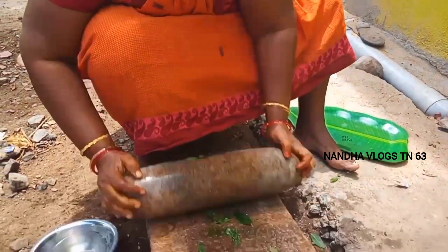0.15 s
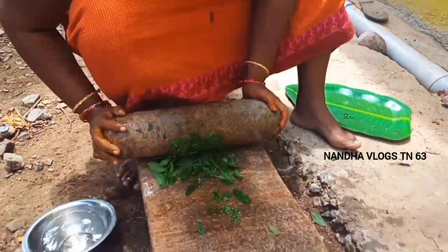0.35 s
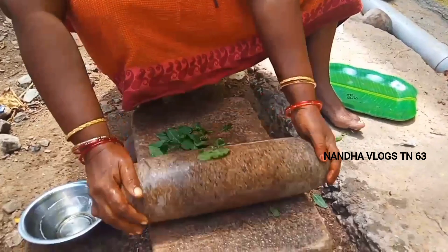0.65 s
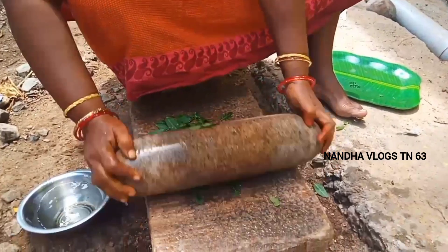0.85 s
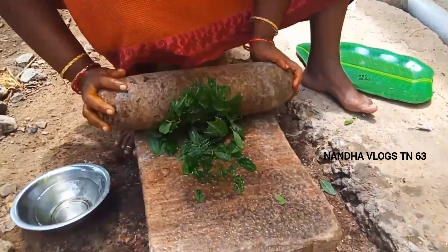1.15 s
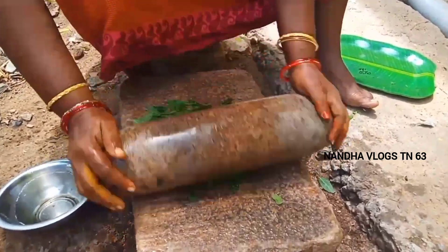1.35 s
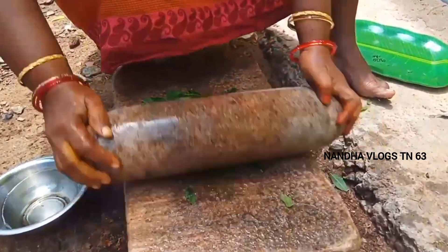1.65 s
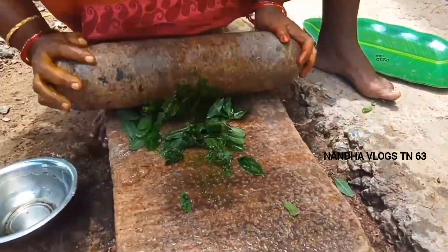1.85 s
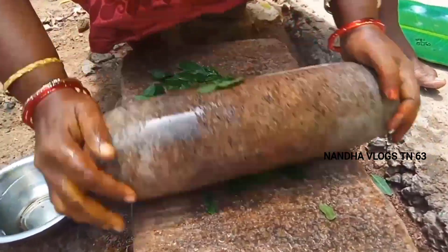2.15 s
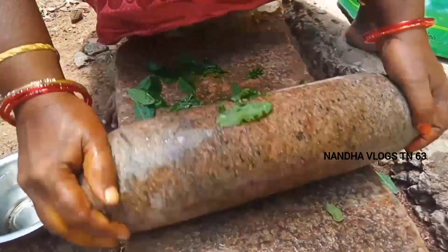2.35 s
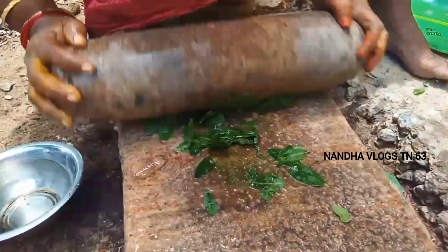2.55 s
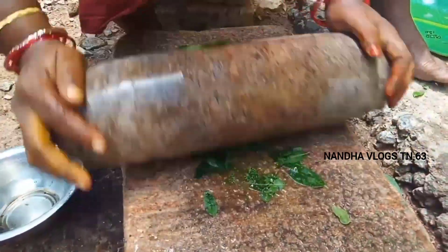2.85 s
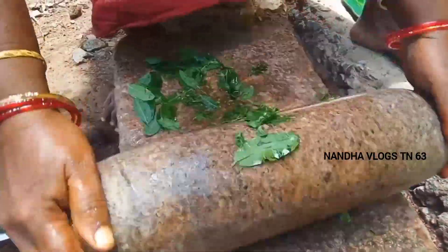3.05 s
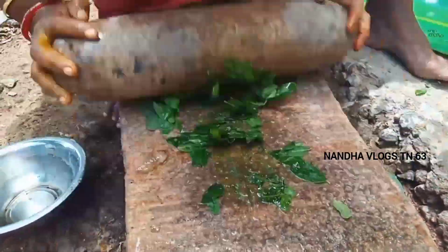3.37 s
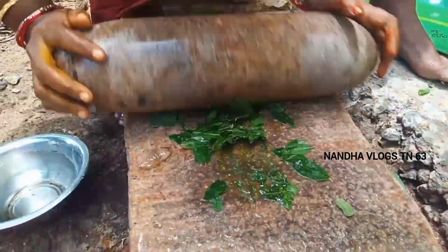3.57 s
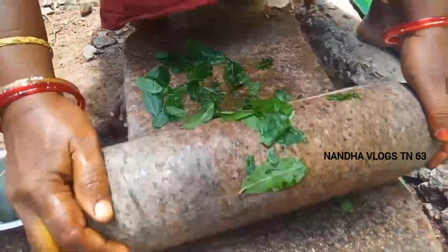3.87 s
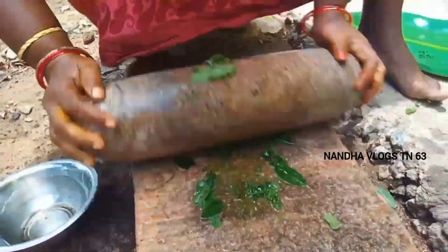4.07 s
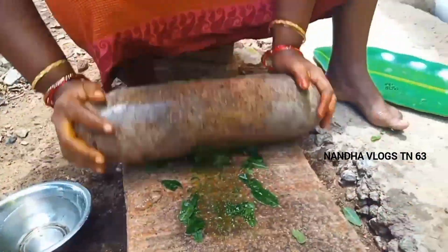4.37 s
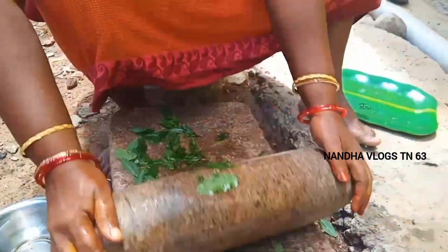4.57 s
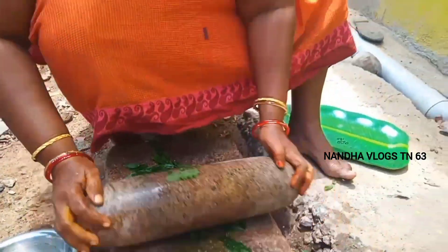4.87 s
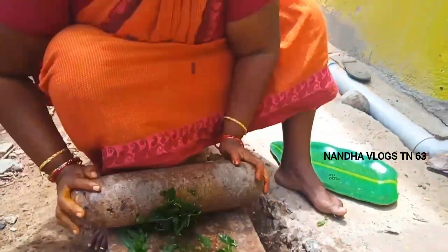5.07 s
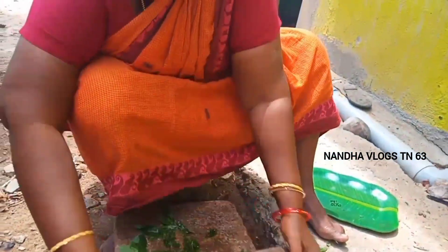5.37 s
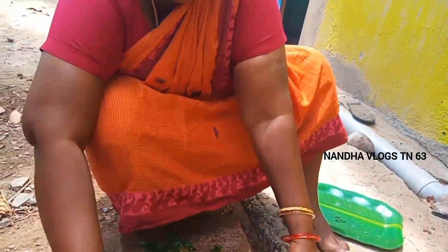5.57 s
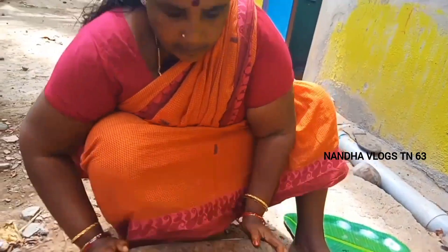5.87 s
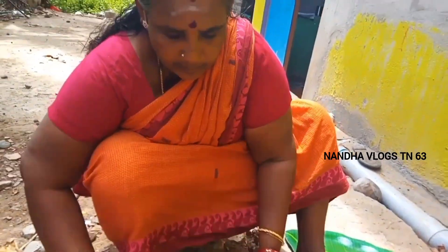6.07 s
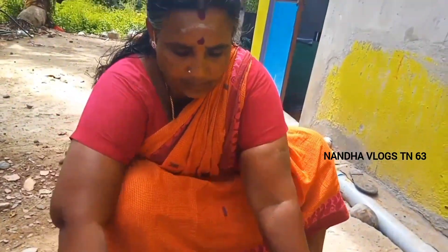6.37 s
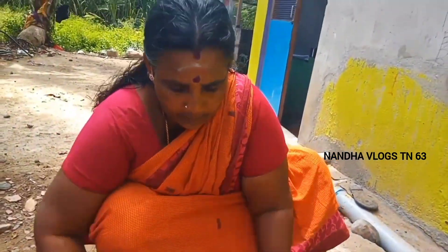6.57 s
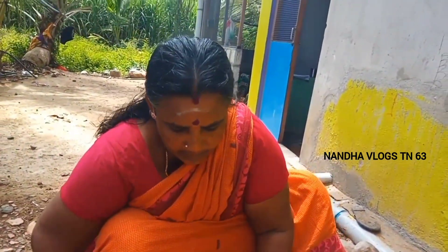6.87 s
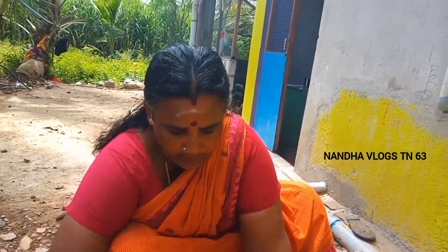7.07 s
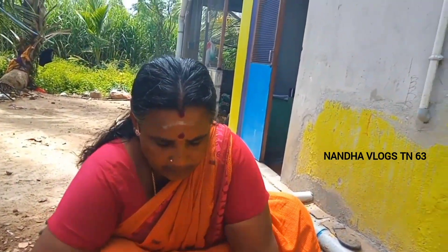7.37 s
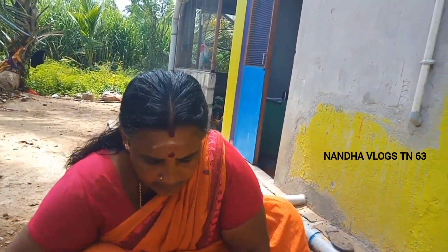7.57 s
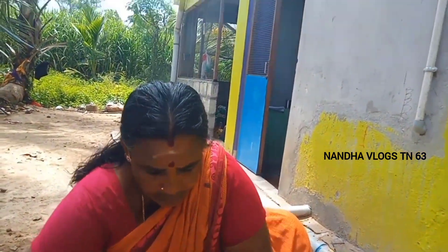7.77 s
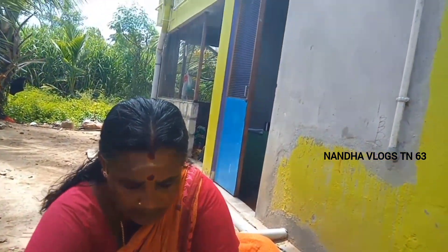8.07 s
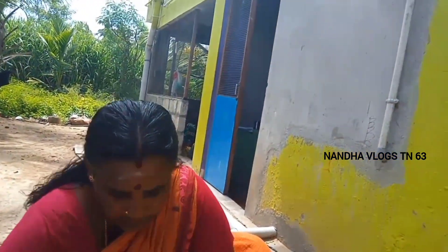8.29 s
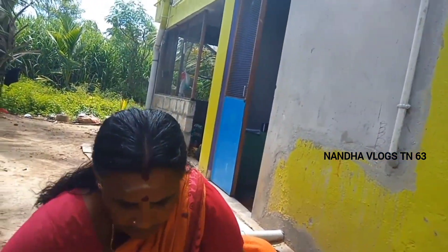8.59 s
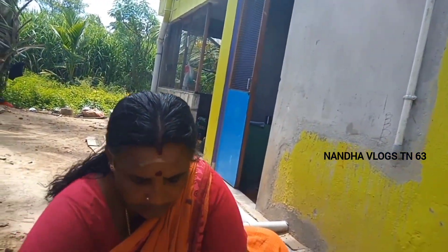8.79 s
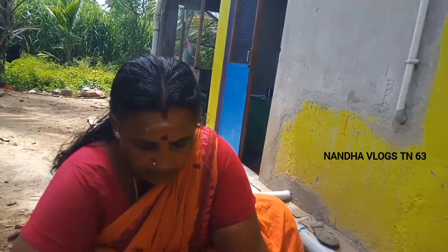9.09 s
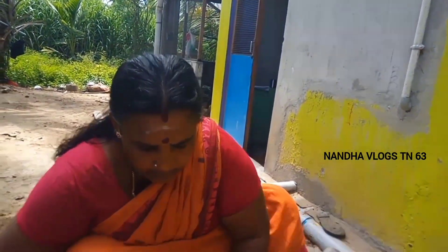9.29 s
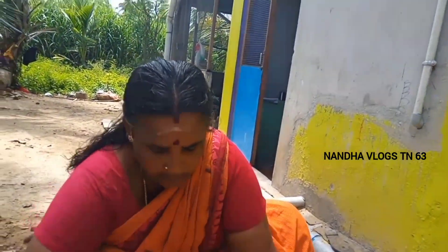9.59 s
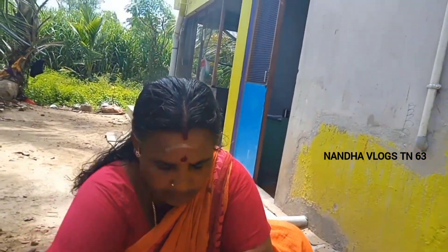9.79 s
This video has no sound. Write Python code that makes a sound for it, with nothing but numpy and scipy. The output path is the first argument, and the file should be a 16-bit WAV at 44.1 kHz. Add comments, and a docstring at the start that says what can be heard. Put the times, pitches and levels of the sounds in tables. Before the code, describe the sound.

A heavy stone roller scrapes back and forth over wet leaves and grit on a slab, with hard irregular knocks and chinking bangles outdoors.

```python
"""First comes a short hiss of wet grit: a stone roller is pushed to and fro over fresh leaves on a slab, outdoors.
The hiss is noise plus random grit clicks, filtered; a low rumble of filtered noise follows each stroke.
At the turns the roller knocks down and rocks onto its other end: dying tones, echoed by a rough house wall.
Bangles on the wrists chink in clusters of high tones, and hard grains crack in short bursts of noise.
Halfway the microphone tilts up, away from the slab: the top treble fades, then partly returns."""
import sys
import numpy as np
from scipy import signal
from scipy.fft import rfft, irfft
from scipy.io import wavfile
from scipy.ndimage import uniform_filter1d

SR = 44100
rng = np.random.default_rng(int(sys.argv[2]) if len(sys.argv) > 2 else 0)


def persist_wave(psi):
    """Save psi, clipped to +-1, as 16-bit WAV."""
    counts = np.round(np.clip(psi, -1, 1) * 32767).astype(np.int16)
    wavfile.write(sys.argv[1], SR, np.atleast_2d(counts).T)


N = 438354  # length of the scene [samples]

# Colour of the faint outdoor background: (frequency [Hz], relative level [dB])
AIR_COLOUR = [(20, -29), (45, -9.5), (90, -13.5), (200, -3.5), (400, -13.5), (900, -14.5), (2000, -21),
              (4500, -34.5), (7000, -10.5), (9000, -21.5), (13000, -33), (15000, -24)]

# Pushes and pulls of the roller; the scrape is trimmed again later:
# (start [s], length [s], level at the hardest press before trim [dB],
#  place of that press in the stroke [share of length], rise from the stroke's ends to it [dB])
STROKES = [(0.006,0.28,-42,0.38,21.5), (0.404,0.18,-43.5,0.24,7.5), (0.77,0.27,-47,0.29,15),
           (1.14,0.3,-40.5,0.37,16), (1.565,0.25,-37.5,0.28,11.5), (1.929,0.27,-36,0.38,19),
           (2.337,0.24,-46,0.29,6.5), (2.709,0.27,-40,0.28,14), (3.125,0.2,-35.5,0.51,14),
           (3.501,0.28,-37,0.22,17.5), (3.909,0.26,-45.5,0.2,7), (4.292,0.29,-49,0.13,6),
           (4.748,0.25,-60,0.88,-7), (5.13,0.28,-55,0.42,1.5), (5.547,0.28,-48.5,0.37,10.5),
           (5.998,0.24,-52,0.59,-2.5), (6.442,0.25,-49.5,0.19,6), (6.865,0.25,-52,0.94,3.5),
           (7.3,0.24,-44.5,0.45,4.5), (7.66,0.31,-47.5,0.47,12), (8.13,0.25,-52.5,0.27,10.5),
           (8.572,0.21,-53,0.28,4.5), (8.954,0.32,-51.5,0.086,7.5), (9.367,0.26,-53.5,0.24,8.5),
           (9.819,0.21,-49.5,0.44,18.5)]
# The roller gathers speed before each stroke and slows after it [dB/s]; a little rubbing stays at the turns [dB]
START_DB_PER_S, STOP_DB_PER_S, REST_DB = 267.5, 323.5, -78.5
FIRM_DB = -40.5  # rubbing level of a firm stroke, before trim
# Colour of the wet grit: (frequency [Hz], relative level [dB])
SCRAPE_COLOUR = [(300, -36), (1100, -22), (1700, -10), (2400, -10.5), (3300, -5), (5000, -3), (7400, -2),
                 (8300, -13.5), (9500, -15.5), (10500, -5), (11400, -3), (12600, -20.5), (13800, -26),
                 (15200, -7.5), (15900, -34)]
# Tones that the grit keeps ringing in the stones: (frequency [Hz], width to each side [Hz], average lift [dB])
SINGING_MODES = [(2380, 270, 7.5), (2775, 230, 4.5)]
# A broad peak in the hiss climbs as the rubbing gets stronger:
# pitch at rest [Hz], climb [octaves per dB of rubbing], width to each side [octaves], lift [dB]
PEAK_HZ, PEAK_CLIMB, PEAK_OCTAVES, PEAK_DB = 2600, 0.02, 0.278, 3.5
PEAK_DRIFT_OCTAVES = .3  # typical stray of that peak as the gap between the stones changes shape
SLIPS_PER_S, SLIP_S = 70, .0025  # sudden slips roughen the scrape: how many, and how fast each dies
BACK_END_DB = 1.5  # low grains gain this at the back end of the slab and lose it at the front end
# Leaves giving way under the roller: (middle [s], length [s], level before trim [dB])
CRUNCHES = [(0.511, 0.089, -39.5), (1.935, 0.025, -43.5), (2.355, 0.072, -42), (2.455, 0.054, -38.5),
            (2.735, 0.031, -44.5), (3.115, 0.076, -43), (3.35, 0.06, -47), (3.61, 0.079, -39),
            (4.492, 0.058, -48), (4.865, 0.057, -49.5), (4.995, 0.022, -44), (5.158, 0.035, -43.5),
            (5.68, 0.16, -50.5), (6.107, 0.019, -41.5), (6.182, 0.015, -41.5), (6.213, 0.013, -41),
            (6.58, 0.021, -39.5), (6.819, 0.027, -49), (6.87, 0.062, -47.5), (7.096, 0.041, -36),
            (7.725, 0.041, -42), (7.835, 0.099, -56), (7.95, 0.015, -45.5), (8.98, 0.041, -45.5),
            (9.175, 0.037, -43.5)]
# The top treble as the microphone tilts away: (time [s], treble change [dB])
TILT = [(3.3, -3), (4.05, 1), (5.7, -3.5), (7.4, -10), (9.9, -4.5)]

# Colour of the slab's low rumble: (frequency [Hz], relative level [dB])
RUMBLE_COLOUR = [(20, -29.5), (45, -11), (70, 3.5), (105, 7), (150, -8.5), (230, -29), (400, -37.5),
                 (3000, -79)]
# Bumpy stretches where the roller shakes the slab: (middle [s], length [s], level before trim [dB])
BUMPS = [(.27, 0.14, -56), (.935, 0.034, -44.5), (1.04, 0.11, -49.5), (1.21, 0.23, -53.5),
         (1.52, 0.092, -55), (1.75, 0.18, -53.5), (2.28, 0.058, -63.5), (2.65, 0.36, -51),
         (3.66, 0.32, -54.5), (4.03, 0.41, -54.5), (5.425, 0.044, -51.5), (5.77, 0.13, -60),
         (5.875, 0.028, -53.5), (6.72, 0.083, -54.5), (7.92, 0.1, -52.5), (8.64, 0.21, -63),
         (9.59, 0.15, -56)]
ROLL_DB, ROLL_FOLLOW = -70, 0.19  # rumble in a firm stroke [dB, before trim], gain per dB of rubbing [dB]

# How long the yard rings: (frequency [Hz], time to fall by 60 dB [s])
YARD_RING = [(100, 0.27), (500, 0.13), (900, 0.26), (1650, 0.28), (2400, 0.084), (3200, 0.12),
             (12000, 0.22)]

# The roller meets the slab: (time [s], clack level [dB], contact pitch [Hz], bandwidth, held to 0.2-4 [octaves],
#  slab thud level [dB], delay of the other end [s], its level against the clack [dB],
#  echo level against the clack [dB], roller's own ring against the clack [dB])
KNOCKS = [ (0.183, -16, 1480, 2.3, -20.5, 0.0032, 6, -10.5, -13),
          (1.0015, -37, 303, 0.86, -32, 0.0053, -25, -33, -40),
          (1.14, -43, 717, 0.14, -57, 0.011, -13, -20, -38),
          (1.39, -9, 1180, 2.54, -22, 0.01, -14, -14.5, -12),
          (1.9793, -8, 904, 1.41, -23, 0.0017, -12.5, -18.5, -19),
          (2.5406, -19, 930, 1.45, -27, 0.0014, -27, -18.5, -18),
          (3.5408, -7.5, 862, 1.6, -27.5, 0.0071, -15.5, -24, -25),
          (3.7391, -40.5, 262.4, 1.07, -30.5, 0.0046, -19, -19.5, -41),
          (4.143, -42, 231.5, 1.67, -30.5, 0.011, -6, -15, -32.5),
          (4.6366, -24.5, 672, 0.98, -34, 0.0094, -22, -25.5, -36),
          (4.957, -13, 1380, 1.76, -21, 0.0024, -2, -17.5, -15),
          (5.1373, -36, 807, 0.42, -47.5, 0.015, -14, -22.5, -43),
          (5.4006, -42.5, 458, 0.48, -57, 0.018, -18, -16, -46.5),
          (6.283, -34, 702, 0.5, -49.5, 0.0035, -0.5, -26, -36),
          (6.67, -31.5, 864, 0.49, -37.5, 0.0023, -14, -24, -13),
          (7.4756, -24.5, 870, 1.7, -39.5, 0.0073, -12, -16, -12),
          (7.683, -33.5, 850, 0.7, -49, 0.014, 1, -13, -35),
          (7.8685, -22, 790, 1.22, -32, 0.0074, -32, -24.5, -39),
          (8.36, -34, 618, 1.8, -50, 0.0024, -2, -14, -36.5),
          (9.252, -17, 1116, 0.89, -26.5, 0.0053, -5, -23.5, -15),
          (9.551, -28.5, 760, 0.98, -49, 0.014, -9, -20.5, -28)]
# Ring of roller and slab together: (frequency [Hz], relative level [dB], time to fall by 60 dB [s])
STONE_MODES = [(535, -8, .018), (680, -1, .016), (830, -4, .012), (1095, 0, .011), (1340, -3, .008),
               (1800, -4, .006)]
# The roller's own ring, bare stone on stone: (frequency [Hz], relative level [dB], time to fall by 60 dB [s])
ROLLER_MODES = [(2410, -1.5, 0.019), (3125, -0.5, 0.031)]
# The slab bouncing on the ground: (frequency [Hz], relative level [dB], time to fall by 60 dB [s])
SLAB_MODES = [(98.26, 9, 0.025), (153, -2.5, 0.1), (221, 0.5, 0.046), (336.2, 1.5, 0.022)]
# Small bounces after landing: time span [s], level against the clack [dB], which shrinks to nothing over the span
SETTLE_S, SETTLE_DB = 0.034, -16
SOFTER = .92  # later contacts are softer: their share of the first one's pitch

# Hard grains and stalks crack under the roller: (time [s], peak level [dB])
CRACKS = [(0.1839, -23), (2.513, -27.5), (2.542, -19.5), (2.7657, -31.5), (2.7756, -26), (2.797, -27),
          (3.095, -38), (3.2065, -38), (3.2667, -20), (3.307, -21), (3.318, -26.5), (3.5139, -22),
          (3.6285, -24), (4.954, -23), (7.095, -39), (8.086, -34.5), (8.982, -40)]

# Bangles touch: (time [s], level of the loudest moment [dB], time they keep rattling [s],
#  lift of the lower tones [dB per octave])
CHINKS = [(0.6602, -27.5, 0.022, 3.5), (0.908, -35.5, 0.0053, 0), (1.074, -44, 0.013, -3),
          (1.31, -31, 0.014, 5), (1.3190, -22.5, 0.0047, -6.5), (1.868, -31, 0.007, -4),
          (2.1225, -28, .003, -11), (2.128, -29, 0.011, 3), (2.184, -46.5, .004, 6.5),
          (2.9054, -20.5, 0.02, 1.5), (2.943, -35.5, 0.003, -2), (3.6452, -29, 0.0056, -5.5),
          (4.467, -42, 0.0035, -10.5), (4.755, -53, 0.013, 28.5), (5.351, -35.5, 0.024, 10),
          (5.388, -38, 0.0077, 11), (6.166, -39.5, 0.0077, 10), (7.0295, -30, 0.013, 4.5),
          (7.845, -43, 0.011, 11), (8.7207, -46, 0.0097, -1), (9.897, -49, 0.016, 2)]
# Each bending tone of the bangles is a cluster, as no two rings are alike:
# (frequency [Hz], spread to each side [Hz], relative level [dB], time to fall by 60 dB [s])
BANGLE_MODES = [(4780, 320, -30.5, 0.09), (8400, 330, -18, .06), (9335, 240, -15.5, .075),
                (10800, 1700, -11, 0.0089), (13200, 130, -12, 0.035), (14300, 490, -12.5, 0.028),
                (14860, 310, -2, 0.048)]

# Metal rings faintly after a knock: (time [s], peak level [dB])
THIN_RINGS = [(4.957, -69), (6.284, -69)]
THIN_HZ, THIN_T60_S = 5173, 1.5  # its pitch, and its time to fall by 60 dB

# The stone sticks and slips and sings in one tone: (start [s], length [s], pitch [Hz], level in the middle [dB])
GROANS = [(7.297, 0.3, 218, -55.5), (9.549, 0.06, 3050, -61), (9.818, 0.063, 3200, -63)]

# The roller totters loosely on the slab: (middle [s], length [s], level in the middle [dB])
RATTLES = [(7.482, 0.033, -43), (7.745, 0.1, -60), (9.62, 0.021, -63.5), (9.835, 0.16, -66.5),
           (9.877, 0.059, -55)]

EDGE_HZ = 15650  # treble above this is cut


def amp(db):
    """Turns decibels into a gain."""
    return 10 ** (np.asarray(db) / 20)


def unit(x):
    """Scales a signal to an average strength (rms) of 1."""
    return x / np.sqrt(np.mean(x ** 2) + 1e-20)


def read(points, hz):
    """Reads a table at the given frequencies, with pitch spaced as the ear hears it (log scale)."""
    f, value = np.transpose(points)
    return np.interp(np.log(hz + 1), np.log(f + 1), value)


def follow(rows, t):
    """Reads each column of a timed table at the times t."""
    s, *columns = np.transpose(rows)
    return [np.interp(t, s, c) for c in columns]


def add(mix, s, sound):
    """Lays a sound into the mix, starting at s seconds."""
    part = mix[max(round(s * SR), 0):][:len(sound)]
    part += sound[:len(part)]


def colour(x, spectrum):
    """Makes each frequency of x louder or softer, as a colour table says."""
    hz = np.fft.rfftfreq(len(x), 1 / SR)
    return irfft(rfft(x) * amp(read(spectrum, hz)), len(x))


def wander(rate_hz):
    """Smooth random drift of rms 1; movement faster than the given rate fades out."""
    hz = np.fft.rfftfreq(N, 1 / SR)
    return unit(irfft(rfft(rng.standard_normal(N)) / (1 + (hz / rate_hz) ** 2), N))


def ring(modes, t):
    """Sums dying tones; each blow lands elsewhere, so their levels and pitches vary a little."""
    hz, db, t60 = np.transpose(modes)[:, :, None]
    weight_db, shift = rng.standard_normal((2, len(modes), 1))
    phase = 2 * np.pi * hz * (1 + .015 * shift) * t
    fade = np.exp(-np.log(1000) * t / t60)
    return (amp(db + weight_db) * fade * np.sin(phase)).sum(0)


def swells(rows):
    """Gain that rises and falls in one smooth arch for each row."""
    gain = np.zeros(N)
    for middle, length, db in rows:
        arch = np.sqrt(np.hanning(max(int(length * SR), 3)))
        add(gain, middle - length / 2, amp(db) * arch)
    return gain


def contact(x, hz, octaves, order=3):
    """The springy contact passes a band of the tones, narrower when leaves cushion it; scaled to peak 1."""
    edges = hz * 2 ** (np.clip(octaves, .2, 4) * np.array([-.5, .5]))
    y = signal.sosfilt(signal.butter(order, edges, "bandpass", fs=SR, output="sos"), x)
    return y / abs(y).max()


def air():
    """Faint outdoor background: steady coloured noise."""
    return amp(-69.5) * unit(colour(rng.standard_normal(N), AIR_COLOUR))


def rubbing(t):
    """Rubbing level in dB: each stroke gets going, moves to and from its hardest press, and stops."""
    power = amp(REST_DB) ** 2
    for start, length, db, hardest, swell_db in STROKES:
        end = start + length
        peak = start + length * np.clip(hardest, .05, .95)
        press_db = np.interp(t, [start, peak, end], [-swell_db, 0, -swell_db])
        before_s, after_s = np.maximum(start - t, 0), np.maximum(t - end, 0)
        speed_db = -START_DB_PER_S * before_s - STOP_DB_PER_S * after_s
        power = power + amp(np.maximum(db + press_db + speed_db, -150)) ** 2
    return 10 * np.log10(power)


def position(t):
    """Roller's place: strokes pull it to the back end (1) and push it to the front end (-1) in turn."""
    way = []
    for k, (start, length, *_) in enumerate(STROKES):
        side = (-1) ** k
        way += [(start, -side), (start + length, side)]
    return follow(way, t)[0]


def scrape(level_db, bite=0.11, coarse_db=-5.5, grit_per_s=650, grit_db=7.0, judder_db=1.87,
           patchy_db=3.0, low_patchy_db=0.5, trim_db=-3.5):
    """Countless tiny grit fractures, a few large; pressing harder brings out coarser, lower grains."""
    clicks = rng.choice([-1, 1], N) * (rng.random(N) < grit_per_s / SR)
    grit = clicks * amp(grit_db + 2.7 * np.minimum(rng.exponential(1, N), 4))
    source = unit(colour(grit + rng.standard_normal(N), SCRAPE_COLOUR))

    # split into short slices of time and frequency, to reshape the colour as it moves
    hz, t, z = signal.stft(source, SR, nperseg=512, noverlap=384)
    hz = hz[:, None]
    press_db = np.interp(t, np.arange(N) / SR, level_db) - FIRM_DB
    top_db, = follow(TILT, t)
    low = 1 / (1 + (hz / 3200) ** 4)
    high = 1 - 1 / (1 + (hz / 8600) ** 10)
    grain_db = low * (coarse_db + bite * press_db + BACK_END_DB * position(t))

    # the gap between the stones keeps changing shape, so narrow resonances come and go
    patches = uniform_filter1d(rng.standard_normal(z.shape), size=4, axis=0)
    patches = unit(uniform_filter1d(patches, size=16, axis=1))
    patches_db = (patchy_db + low_patchy_db * low) * patches

    # each singing tone swells and fades as the line of contact travels
    drifts = rng.standard_normal((len(SINGING_MODES) + 1, len(t)))
    peak_drift, *mode_drifts = unit(uniform_filter1d(drifts, size=40, axis=1))
    modes_db = 0
    for (f, width, db), drift in zip(SINGING_MODES, mode_drifts):
        modes_db = modes_db + db * (1 + .5 * drift) * np.exp(-((hz - f) / width) ** 2)

    # distance of each frequency from the moving broad peak
    climb_octaves = PEAK_CLIMB * (press_db + FIRM_DB - REST_DB)
    peak_octaves = np.log2((hz + 1) / PEAK_HZ) - climb_octaves + PEAK_DRIFT_OCTAVES * peak_drift
    peak_db = PEAK_DB * np.exp(-(peak_octaves / PEAK_OCTAVES) ** 2)

    z = z * amp(grain_db + high * top_db + patches_db + modes_db + peak_db)
    hiss = signal.istft(z, SR, nperseg=512, noverlap=384)[1][:N]

    # clumps of grit and leaf give way in sudden slips, and the roller judders over the pitted slab
    slips_db = rng.uniform(2, 9, N) * (rng.random(N) < SLIPS_PER_S / SR)
    slips_db = signal.lfilter([1], [1, -np.exp(-1 / (SLIP_S * SR))], slips_db)
    rough_db = np.minimum(slips_db, 10) + judder_db * wander(rate_hz=39)
    gain = np.hypot(amp(level_db + rough_db), swells(CRUNCHES))
    return hiss * gain * amp(trim_db)


def rumble(level_db, lumpy_db=2.0, trim_db=2.5):
    """The uneven roller shakes the slab as it travels, most over the bumps."""
    rolling = amp(ROLL_DB + ROLL_FOLLOW * (level_db - FIRM_DB))
    gain = np.hypot(rolling, swells(BUMPS))
    shaking = unit(colour(rng.standard_normal(N), RUMBLE_COLOUR))
    return shaking * gain * amp(lumpy_db * wander(rate_hz=63) + trim_db)


def yard(x, wall_s=0.021, wall_spread_s=0.0045, wall=0.83):
    """The rough house wall answers first, then scattered echoes die away in the open."""
    size = 22050  # half a second of echoes
    t = np.arange(size) / SR
    taps = rng.standard_normal(size) * (rng.random(size) < 1500 / SR)  # about 1500 echoes per second
    taps = taps * (1 - np.exp(-(t / 0.019) ** 2))  # few at first
    taps = taps * (1 + wall * np.exp(-((t - wall_s) / wall_spread_s) ** 2))
    # each pitch dies at its own speed
    hz, at, z = signal.stft(taps, SR, nperseg=256)
    fade = np.exp(-np.log(1000) * at / read(YARD_RING, hz)[:, None])
    tail = signal.istft(z * fade, SR, nperseg=256)[1]
    return signal.fftconvolve(x, tail / np.linalg.norm(tail))[:N]


def knocks():
    """One end of the roller lands, then the other, and the slab thuds; each spot echoes differently."""
    out, t = np.zeros(N), np.arange(SR // 6) / SR
    for s, db, hz, octaves, thud_db, rock_s, rock_db, echo_db, ring_db in KNOCKS:
        clack = np.zeros(len(t))
        add(clack, 0, amp(db) * contact(ring(STONE_MODES, t), hz, octaves))
        # the other end lands, and the roller settles in four small irregular bounces
        later = [(rock_s, amp(rock_db))]
        for u in rng.uniform(.2, .9, size=4):
            later.append((SETTLE_S * u, amp(SETTLE_DB) * (1 - u)))
        for at, share in later:
            add(clack, at, share * amp(db) * contact(ring(STONE_MODES, t), hz * SOFTER, octaves))
        add(clack, 0, amp(db + ring_db) * ring(ROLLER_MODES, t) / len(ROLLER_MODES))
        add(out, s, clack)
        add(out, s, amp(echo_db) * yard(clack))
        add(out, s, amp(thud_db) * contact(ring(SLAB_MODES, t), hz=176.7, octaves=1.95))
    return out


def cracks(snap_s=0.00074, crumble_s=0.013, crumble=0.21):
    """A grain or stalk breaks: a sharp snap of noise, then a short crumbling."""
    out, t = np.zeros(N), np.arange(SR // 20) / SR
    for s, db in CRACKS:
        fade = np.exp(-t / snap_s) + crumble * np.exp(-t / crumble_s)
        burst = rng.standard_normal(len(t)) * fade
        add(out, s, amp(db) * burst / abs(colour(burst, SCRAPE_COLOUR)).max())
    return colour(out, SCRAPE_COLOUR)


def bangles(count=12, gap_s=0.0052):
    """Thin rings chatter in separate ticks, each at a new spot; a slower touch favours the low tones."""
    out, t = np.zeros(N), np.arange(SR // 10) / SR
    hz, spread_hz, mode_db, t60 = np.repeat(BANGLE_MODES, count, axis=0).T[:, :, None]
    hz = hz + spread_hz * rng.uniform(-0.87, 1, hz.shape)
    modes = amp(mode_db) * np.exp((2j * np.pi * hz - np.log(1000) / t60) * t)
    modes = modes * np.minimum(t / .0004, 1)  # each tick starts over 0.4 ms
    for s, db, rattle_s, lift_db in CHINKS:
        gaps = gap_s * (.5 + rng.random(count))
        times = np.cumsum(gaps) - gaps[0]
        # every touching pair has its own colour, and every spot starts the tones differently
        pair_db = 3 * np.repeat(rng.standard_normal(len(BANGLE_MODES)), count)
        tone_gain = amp(pair_db + lift_db * np.log2(hz.max() / hz.T))
        spots = np.exp(2j * np.pi * rng.random((count, len(hz)))) * tone_gain
        chink = np.zeros(len(t))
        for at, tick in zip(times, (spots @ modes).real):
            add(chink, at, np.exp(-(at / rattle_s) ** 2) * tick)
        loudest = np.sqrt(uniform_filter1d(chink ** 2, size=256).max())
        add(out, s, amp(db) * chink / loudest)
    return out


def thin_rings():
    """A knock sets nearby metal ringing in one fine, steady tone that slowly dies."""
    out, t = np.zeros(N), np.arange(SR // 3) / SR
    tone = np.exp(-np.log(1000) * t / THIN_T60_S) * np.sin(2 * np.pi * THIN_HZ * t)
    for s, db in THIN_RINGS:
        add(out, s, amp(db) * tone)
    return out


def groans():
    """The dragging roller sticks and slips: short tones whose pitch wavers."""
    out = np.zeros(N)
    for s, length_s, hz, db in GROANS:
        size = int(max(length_s, .02) * SR)
        waver_hz = 1.3 * np.sqrt(hz) * wander(rate_hz=110)[:size]
        tone = np.sin(2 * np.pi * np.cumsum(hz + waver_hz) / SR)
        add(out, s, amp(db) * np.sqrt(2) * np.hanning(size) * tone)
    return out


def rattles(taps_per_s=500, hz=650, octaves=1.62):
    """Many light taps of the tottering roller ring the low tones of the stones."""
    taps = rng.choice([-1, 1], N) * rng.random(N) * (rng.random(N) < taps_per_s / SR)
    tap = contact(ring(STONE_MODES, np.arange(SR // 20) / SR), hz, octaves)
    return unit(signal.oaconvolve(taps, tap)[:N]) * swells(RATTLES)


def scene():
    """Adds up everything at the slab; the bright sounds also echo in the open yard."""
    t = np.arange(N) / SR
    level_db = np.interp(t, t[::64], rubbing(t[::64]))  # worked out at every 64th sample to save time
    bright = scrape(level_db) + cracks() + bangles()
    echo = amp(-24.5) * yard(bright)
    low = air() + rumble(level_db)
    stones = knocks() + groans() + rattles()
    return (low + bright + echo + stones + thin_rings())[None]


def record(dry):
    """Cuts the highest treble with a smooth low-pass filter."""
    low_pass = signal.firwin(301, EDGE_HZ, window=("kaiser", 8), fs=SR)
    return signal.oaconvolve(dry, low_pass[None], "same")


dry = scene()
out = record(dry)
persist_wave(out)
```